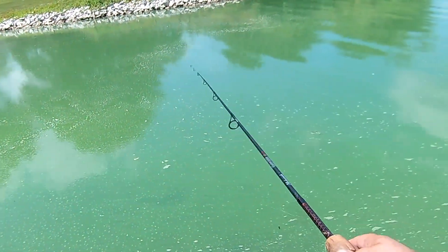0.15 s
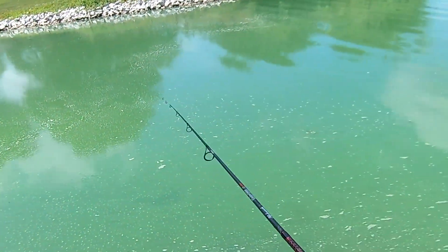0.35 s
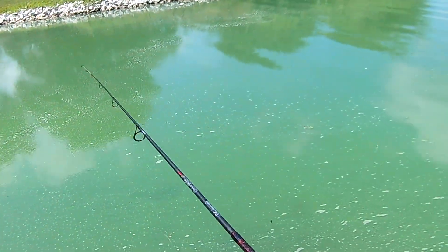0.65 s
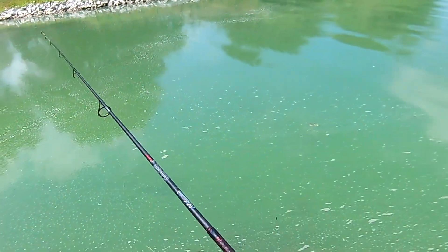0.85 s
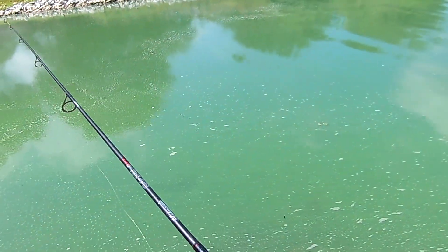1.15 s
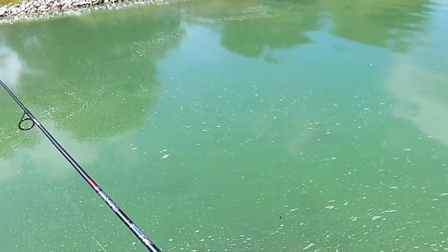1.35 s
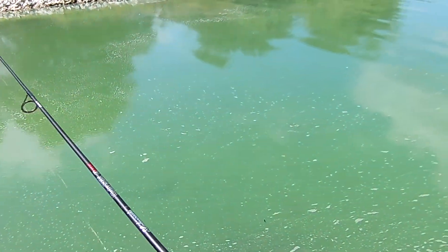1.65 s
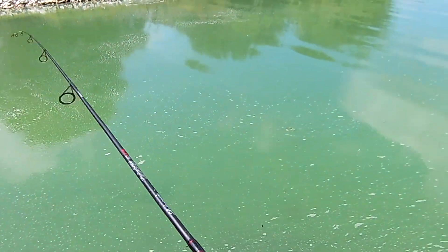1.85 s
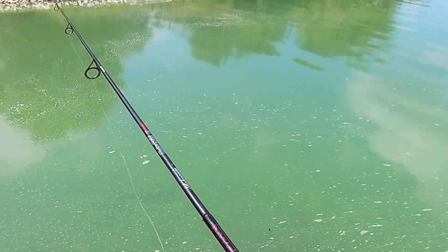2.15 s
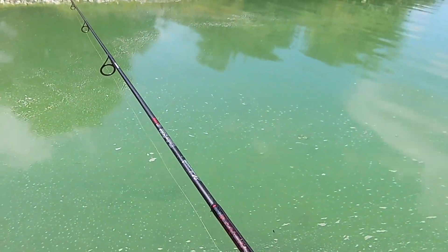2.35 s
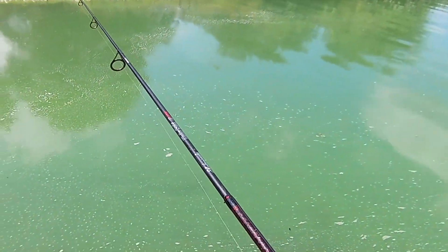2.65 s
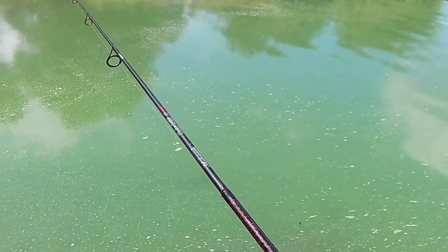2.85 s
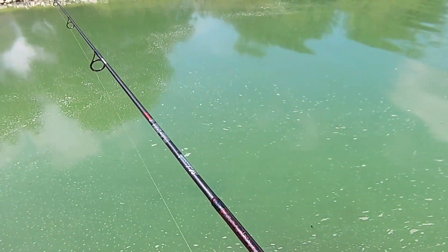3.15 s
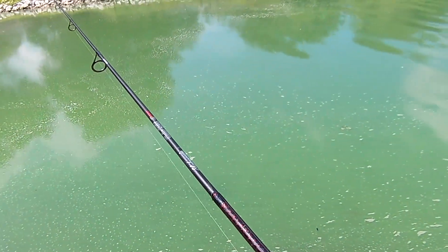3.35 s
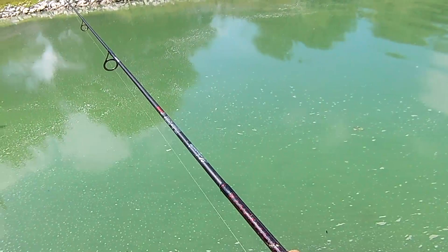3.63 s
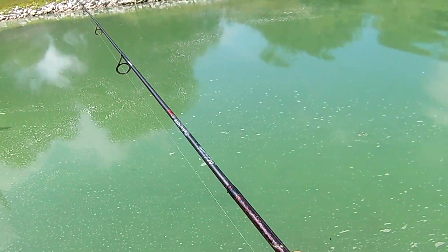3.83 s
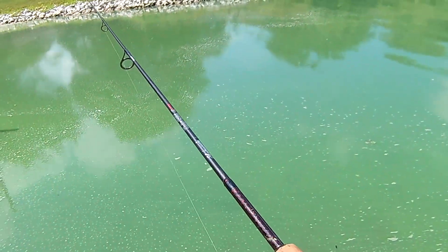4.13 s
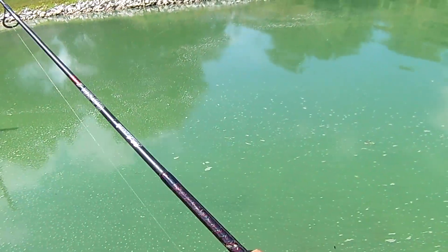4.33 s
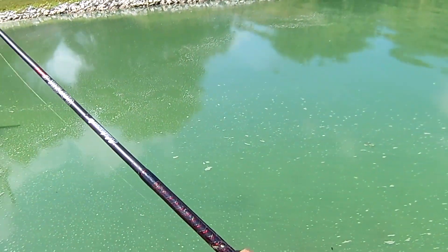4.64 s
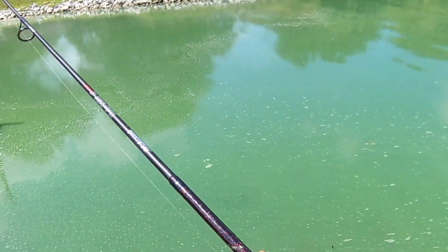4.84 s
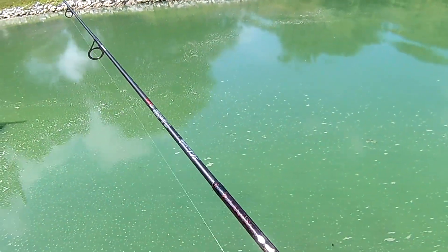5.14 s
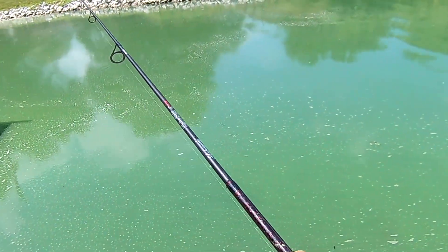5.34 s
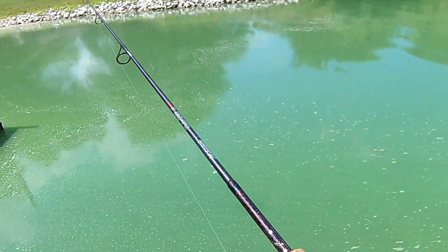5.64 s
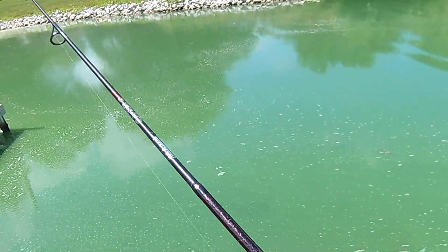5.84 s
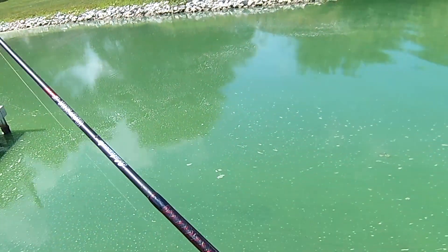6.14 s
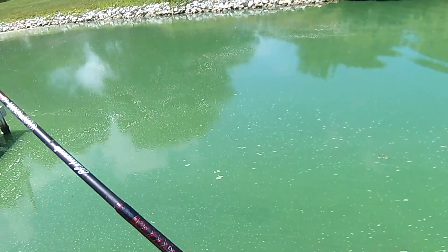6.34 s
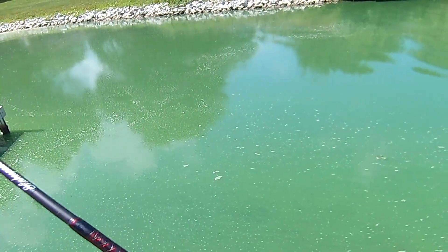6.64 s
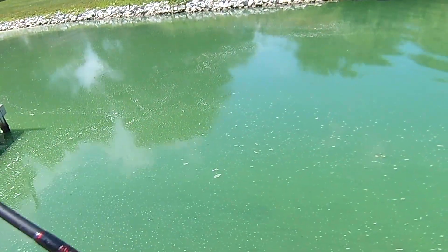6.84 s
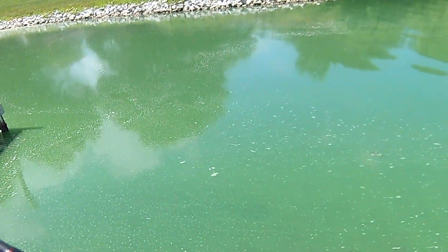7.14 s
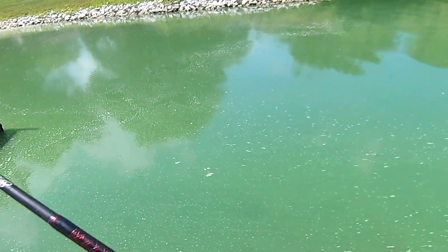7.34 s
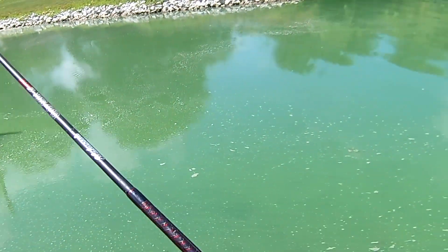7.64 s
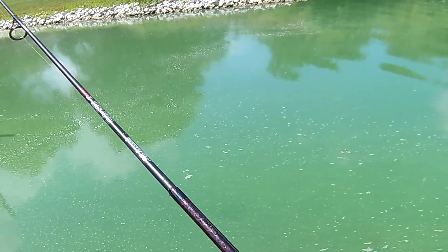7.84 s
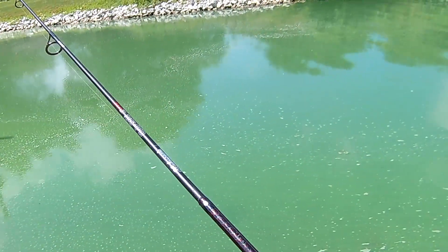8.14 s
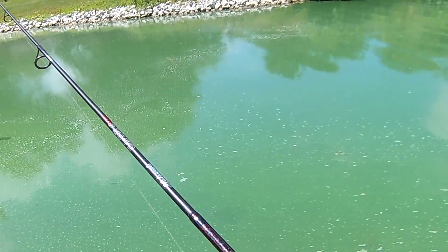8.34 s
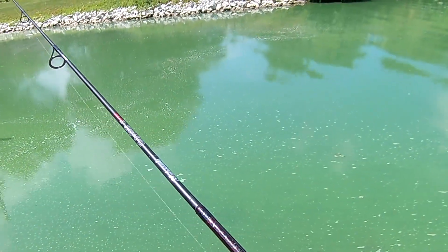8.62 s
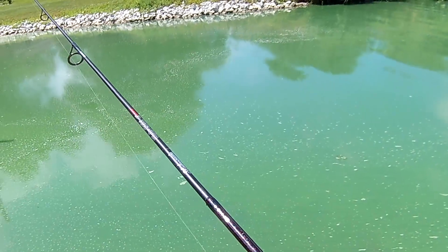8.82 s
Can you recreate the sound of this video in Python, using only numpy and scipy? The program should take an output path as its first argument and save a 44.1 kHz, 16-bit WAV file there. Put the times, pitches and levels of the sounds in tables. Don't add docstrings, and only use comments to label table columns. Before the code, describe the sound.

Outdoors by a pond, a ride-on mower drones steadily in the distance, its low hum beating about three times a second beneath a rough, breathy roar. Close to the microphone a fishing rod knocks now and then, mostly in the first three seconds, with heavy thuds near 2.5 and 5.4 seconds. The reel makes one small rattling click just before two seconds. A very faint, thin breeze hiss lies on top.

```python
import sys
import numpy as np
from scipy import signal
from scipy.fft import rfft, irfft, next_fast_len
from scipy.io import wavfile
from scipy.ndimage import uniform_filter1d

SR = 44100
rng = np.random.default_rng(int(sys.argv[2]) if len(sys.argv) > 2 else 0)


def amp(db):
    return 10 ** (np.asarray(db, float) / 20)


def write(x):
    x = np.atleast_2d(x).T
    wavfile.write(sys.argv[1], SR, np.round(np.clip(x, -1, 1) * 32767).astype(np.int16))


N = 396018

# time in seconds, level in dB, brightness in dB.
BREEZE = [(0.0, -75, 11.5), (0.45, -66, 8), (1.0, -65, 4.5), (1.5, -67.5, 5.5), (2.3, -62.5, 2.5),
          (2.7, -66.5, 8), (3.3, -66, 11.5), (4.3, -70.5, 10), (5.15, -71, 13), (5.6, -68.5, 15),
          (7.1, -67, 9.5), (8.98, -68, 12)]
# frequency in Hz, width in Hz, level in dB.
CASE_MODES = [(4080, 500, -1), (4520, 480, -1), (5750, 800, -8), (7250, 450, -11), (10400, 2200, -16)]
# start in seconds, peak in dB, decay in ms, case over body
# in dB.
REEL_CLICKS = [
    (1.8490, -15, 2.4, -12),
    (1.8534, -21, 1.4, -21),
    (1.865, -24, 3, -15),
    (1.8712, -34.5, 4.7, -12),
]
# frequency in Hz, width in Hz, level in dB.
REEL_BODY = [(477, 180, 3.5), (760, 160, 2.5), (1500, 140, 1), (2200, 190, -12.5), (3400, 990, -25)]
# start in seconds, peak in dB, push length in ms, rebound share.
ROD_KNOCKS = [
    (0.2212, -26.5, 0.11, 0.082),
    (1.011, -25, 0.34, 0.38),
    (1.4423, -16, 0.36, 0.3),
    (1.9699, -21, 0.19, 0.29),
    (2.516, -12, .7, 0.71),
    (3.008, -18, 0.26, 0.28),
    (4.5978, -19.5, 0.21, 0.59),
    (5.3575, -11, 0.6, 0.66),
    (7.7962, -23, 0.36, 0.26),
]
# frequency in Hz, density in dB per Hz.
RUMBLE_COLOUR = [(6, -17), (14, -13), (24, 1), (40, -3.5), (70, -5), (95, -0.5), (125, 3), (150, -8),
                 (190, 2), (250, -5), (330, -6.5), (520, -6)]
BODY_COLOUR = [(450, -17.5), (560, -1), (800, -1.5), (1000, -3.5), (1100, -18.5)]
EDGE_COLOUR = [(900, -11), (1050, 2), (1300, -2), (1500, -9), (1700, -22)]
TOP_COLOUR = [(1400, -8), (1650, 2.5), (2000, -3.5), (2600, -10.5), (3000, -13.5), (3500, -22.5),
              (5500, -26), (8000, -42)]
# time in seconds, level in dB.
GRASS_LOAD = [(0.0, 0), (0.3, 3), (1.0, 0.5), (2.3, -2), (3.3, 3), (4.0, -1.5), (5.7, -1), (6.3, -2),
              (7.2, -0.5), (8.98, 0)]
# time in seconds, throbs per second.
BELT_SLIP = [(0.0, 3.045), (0.6, 3.467), (1.55, 3.32), (2.55, 3.444), (2.95, 3.141), (3.7, 3.062),
             (4.55, 4.239), (5.05, 2.479), (5.55, 3.553), (6.0, 2.627), (6.45, 3.513), (7.95, 3.294),
             (8.2, 3.571), (8.98, 3.141)]
# time in seconds, level in dB.
BLADE_HUM = [(0.0, -25), (0.4, -22.4), (1.4, -20.5), (2.2, -19.5), (2.8, -24), (3.6, -27), (4.25, -37.5),
             (4.6, -34), (5.08, -43.5), (5.45, -29), (6.05, -38.5), (6.6, -23), (7.2, -22.5), (7.8, -25),
             (8.4, -29), (8.98, -32)]
# time in seconds,
# second multiple in dB, fourth multiple in dB.
FAR_BLADE_SWELL = [(0.0, 2.5, 7), (0.5, 2.5, 3), (1.2, 4, -1.5), (1.7, 4.5, 2), (2.5, 5, 2), (2.9, -1, 2),
                   (3.3, 2.5, -5), (3.7, -4.5, 3), (4.1, 0, -4), (4.9, 2.5, 3.5), (5.75, -7, -9.5),
                   (6.1, 3, -8), (6.5, -6.5, 0), (7.0, -0.5, 3.5), (7.4, -0.5, -1), (8.1, 2, -2),
                   (8.98, -3.5, -4)]
# multiple of the pass rate, level in dB, wander in dB.
BLADE_OVERTONES = [(3, -48, 2), (5, -52, 3.5), (6, -56.5, 2.5)]
# time in seconds, firing cycle in Hz, loudness in dB.
ENGINE = [(0.0, 27.557, -32), (0.85, 27.694, -31), (2.0, 27.672, -29.3), (2.85, 27.656, -31.2),
          (3.7, 27.452, -33.4), (4.95, 27.593, -34.7), (5.55, 27.567, -36), (6.3, 27.534, -33.5),
          (7.45, 27.484, -33), (8.98, 27.5, -33.1)]
# multiple of the firing cycle, level in dB, wander in dB.
WEAK_ORDERS = [(1, -47, 1.9), (2, -39.5, 2), (3, -46.5, -0.5), (6, -47, 4), (8, -53, 4.5), (9, -52.5, 3.5),
               (10, -58, -0.5), (12, -56, 2.5), (13, -51, 0.5), (14, -51, 4), (19, -53.5, 5)]
# frequency in Hz, step over the band's rms in dB.
GRAIN_STEP = [(1500, -16), (3000, -2), (5000, 7.5), (7000, 9), (15000, 9)]


def rms_one(x):
    return x / np.sqrt(np.mean(x ** 2) + 1e-20)


def in_time(rows):
    s, *columns = np.transpose(rows)
    return [np.interp(np.arange(N) / SR, s, c) for c in columns]


def at_hz(points, hz):
    point_hz, db = np.transpose(points)
    return np.interp(np.log(hz), np.log(point_hz), db)


def drift(rate):
    r = np.exp(-80 * np.pi * rate / SR)
    steps = rng.standard_normal(N // 40 + 2002)
    slow = signal.lfilter([1], [1, -2 * r, r * r], steps)[2000:]
    return np.interp(np.arange(N) / 40, np.arange(len(slow)), rms_one(slow))


def noise(spectrum, patchy_db):
    size = next_fast_len(N)
    hz = np.arange(size // 2 + 1) * SR / size + 1e-3
    low, high = spectrum[0][0], spectrum[-1][0]
    inside = (hz > low) * (hz < high)
    coloured = amp(at_hz(spectrum, hz)) * inside * rfft(rng.standard_normal(size))
    octave = np.log2(hz / low)
    out = np.zeros(N)
    for k in range(int(np.log2(high / low)) + 2):
        band = irfft(coloured * np.clip(1 - abs(octave - k), 0, 1), size)[:N]
        out += amp(patchy_db * drift(11)) * band
    return rms_one(out)


def turns(hz):
    return np.cumsum(hz) / SR


def tone(cycles, level_db):
    return np.sqrt(2) * amp(level_db) * np.cos(2 * np.pi * cycles)


def wandering(cycles, table, rate):
    out = np.zeros(N)
    for k, db, wander_db in table:
        level_db = db + min(wander_db, 3) * drift(rate)
        out += tone(k * cycles + rng.random(), level_db)
    return out


def resonate(x, hz, width_hz):
    r = np.exp(-np.pi * width_hz / SR)
    poles = [1, -2 * r * np.cos(2 * np.pi * hz / SR), r * r]
    return signal.lfilter([(1 - r * r) / 2, 0, (r * r - 1) / 2], poles, x)


def modes(x, table):
    out = 0
    for k, (hz, width_hz, db) in enumerate(table):
        out = out + (-1) ** k * amp(db) * resonate(resonate(x, hz, width_hz), hz, width_hz)
    return out


def loudness_swing():
    db = in_time(ENGINE)[1]
    return db - db.mean()


def following(db, share, gust_db, load_share=0):
    return db + share * loudness_swing() + load_share * in_time(GRASS_LOAD)[0] + gust_db * drift(0.7)


def near_blade_cycles():
    return turns(4 * in_time(ENGINE)[0] - in_time(BELT_SLIP)[0])


def air():
    first_db, upper_db = in_time(BREEZE)
    white = rng.standard_normal(N)
    first = modes(white, CASE_MODES[:2])
    upper = amp(upper_db - 8.5) * modes(white, CASE_MODES[2:3])
    return amp(first_db - 0.5) * (first + upper) / np.std(first)


def reel():
    out = np.zeros(N)
    dull = signal.butter(4, 4300, fs=SR, output="sos")
    for s, db, ms, case_db in REEL_CLICKS:
        burst = rng.standard_normal(2000) * np.exp(-np.arange(2000) / SR / (ms / 1000))
        body, case = np.zeros(2000), np.zeros(2000)
        for hz, width_hz, d in REEL_BODY:
            body += amp(d) * rms_one(resonate(burst, hz, width_hz)) * np.sqrt(width_hz)
        for k, (hz, width_hz, d) in enumerate(CASE_MODES):
            case += (-1) ** k * amp(d) * rms_one(modes(burst, [(hz, width_hz, 0)]))
        body = rms_one(signal.sosfilt(dull, body))
        at = round(s * SR)
        out[at:at + 2000] += amp(db - 20) * (body + amp(case_db) * case)
    return out


def knocks():
    out = np.zeros(N)
    t = np.arange(1500) / SR * 1000
    back = (t / 4.5) ** 3 * np.exp(3 - 3 * t / 4.5)
    for s, db, ms, rebound in ROD_KNOCKS:
        push = t / ms * np.exp(1 - t / ms)
        soft = signal.butter(2, 900 / ms, fs=SR, output="sos")
        at = round(s * SR)
        out[at:at + 1500] += amp(db) * signal.sosfilt(soft, rebound * back - push)
    return out


def roar(chop=0.08):
    chopped = 1 + chop * np.cos(2 * np.pi * near_blade_cycles())
    body_db = following(-40, share=0.2, gust_db=0.18, load_share=-0.1)
    edge_db = following(-47, share=0.55, gust_db=0.5, load_share=0.1) + 0.5
    top_db = following(-54.5, share=0, gust_db=-0.45, load_share=0.14) + 2.0
    rumble_db = -36 + following(1.2, share=0.1, gust_db=0.55, load_share=0.97)
    body = amp(body_db) * noise(BODY_COLOUR, patchy_db=1.1)
    edge = amp(edge_db) * noise(EDGE_COLOUR, patchy_db=1.1)
    top = amp(top_db) * noise(TOP_COLOUR, patchy_db=1.13)
    rumble = amp(rumble_db) * noise(RUMBLE_COLOUR, patchy_db=1.5)
    return rumble + chopped * (body + edge + top)


def blades():
    far = 3.873 * turns(in_time(ENGINE)[0])
    in_step_s, slip_s, twin_share = 1.5, 3.88, 0.37
    behind = (np.arange(N) / SR - in_step_s) / slip_s
    second_swell, fourth_swell = in_time(FAR_BLADE_SWELL)
    throb_lead_turns = 0.252
    hum = tone(near_blade_cycles() + throb_lead_turns, in_time(BLADE_HUM)[0])
    out = hum + amp(0.33 * loudness_swing()) * wandering(far, BLADE_OVERTONES, rate=1.8)
    for k, db in (2, -35 + second_swell), (4, -45.5 + fourth_swell):
        start = rng.random()
        out += tone(k * far + start, db) + twin_share * tone(k * (far - behind) + start, db)
    return out


def engine():
    hz, fourth_db = in_time(ENGINE)
    cycles = turns(hz)
    from_middle_s = (np.arange(N) - N / 2) / SR
    fifth_db = following(-36, share=1.4, gust_db=-0.8)
    seventh_db = following(-41.5 + 0.5 * from_middle_s, share=-0.087, gust_db=1.9)
    strong = tone(4 * cycles, fourth_db)
    strong += tone(5 * cycles + rng.random(), fifth_db)
    strong += tone(7 * cycles + rng.random(), seventh_db)
    return strong + amp(0.39 * loudness_swing()) * wandering(cycles, WEAK_ORDERS, rate=1.7)


def scene():
    return (air() + reel() + knocks() + roar() + blades() + engine())[None]


def camera_grain(x, size=1024, scatter_db=1.5, strain=0.255, strain_db=-64):
    k, n = np.arange(size) + 0.5, np.arange(2 * size) + 0.5
    window = np.sqrt(2 / size) * np.sin(np.pi * n / size / 2)
    basis = window * np.cos(np.pi / size * np.outer(k, n + size / 2))
    basis = basis.astype(np.float32)
    halves = np.pad(x.astype(np.float32), (size, 2 * size - N % size)).reshape(-1, size)
    frames = np.hstack([halves[:-1], halves[1:]])
    hz = k * SR / size / 2
    strained = np.clip((abs(frames).max(axis=1, keepdims=True) - strain) / 0.044, 0, 1)
    lines = (frames @ basis.T).astype(float)
    lines += strained * amp(strain_db) * rng.standard_normal((len(frames), size))
    band_rms = np.sqrt(np.mean(lines.reshape(len(lines), -1, 32) ** 2, axis=2) + 1e-20)
    band_rms = np.minimum(band_rms, 2 * np.median(band_rms, axis=0))
    scatter = amp(scatter_db * rng.standard_normal(band_rms.shape))
    step = np.repeat(band_rms * scatter, 32, axis=1) * amp(at_hz(GRAIN_STEP, hz))
    rounded = step * np.sign(lines) * np.floor(abs(lines) / step + 0.4) * (hz < 15740)
    back = rounded.astype(np.float32) @ basis
    return (back[1:, :size] + back[:-1, size:]).ravel()[:N].astype(float)


def band_limit(x):
    return signal.sosfilt(signal.butter(12, 15890, fs=SR, output="sos"), x)


def record(dry):
    loudness = np.sqrt(uniform_filter1d(dry ** 2, size=2000) + 1e-9)
    hiss = amp(-72) * (1 + 6.5 * loudness) * rng.standard_normal(dry.shape)
    no_infra = signal.sosfilt(signal.butter(2, 18, "high", fs=SR, output="sos"), dry)
    mix = camera_grain((no_infra + hiss)[0])[None]
    return band_limit(mix)


dry = scene()
out = record(dry)
write(out)
```